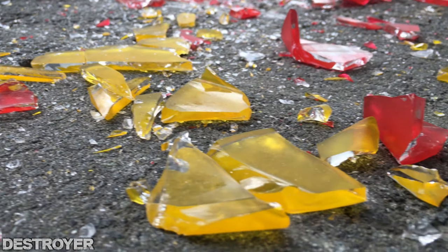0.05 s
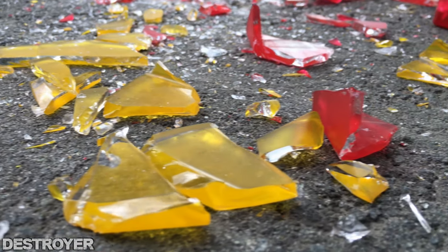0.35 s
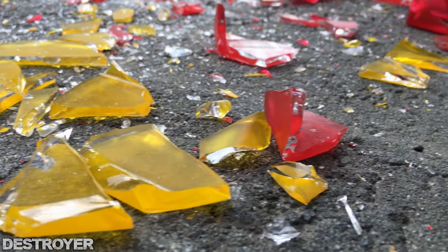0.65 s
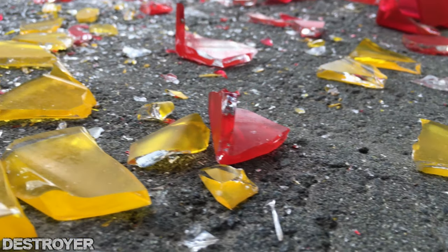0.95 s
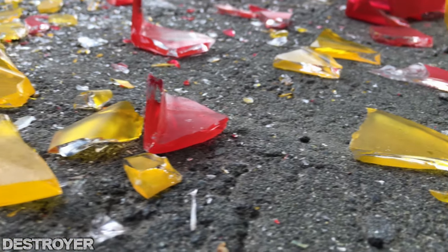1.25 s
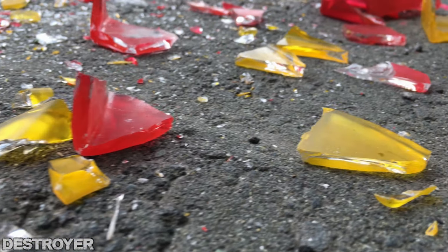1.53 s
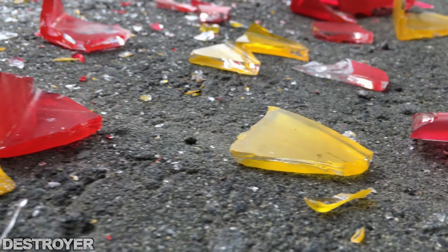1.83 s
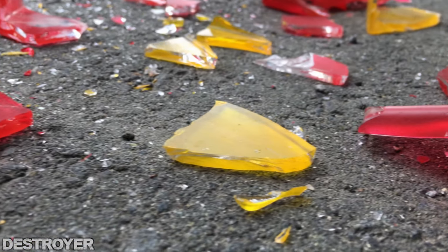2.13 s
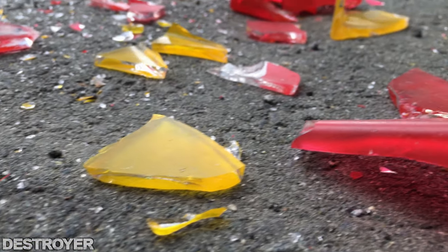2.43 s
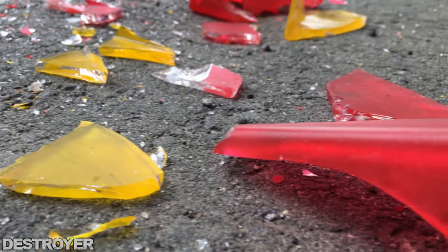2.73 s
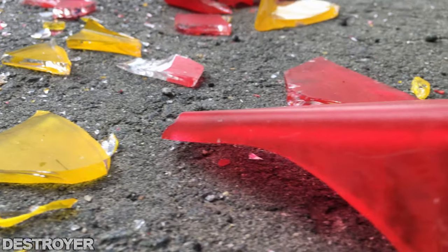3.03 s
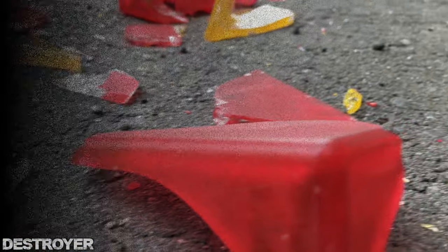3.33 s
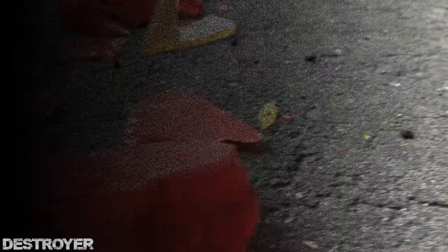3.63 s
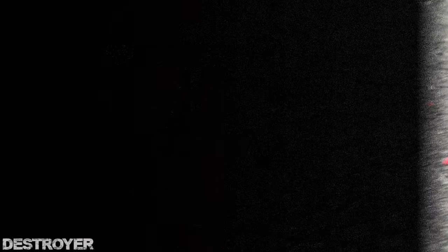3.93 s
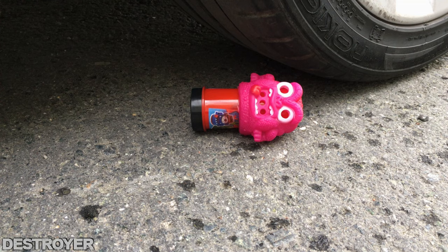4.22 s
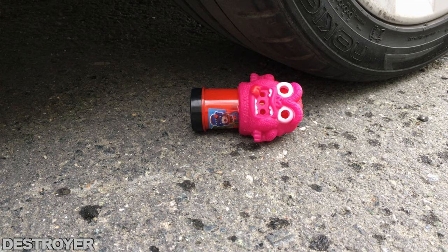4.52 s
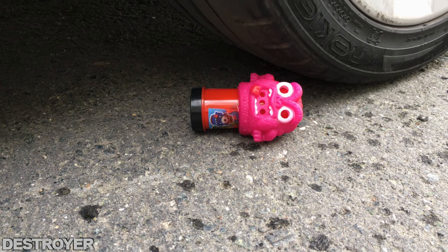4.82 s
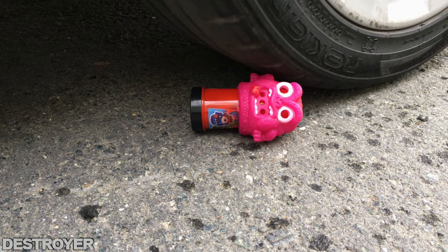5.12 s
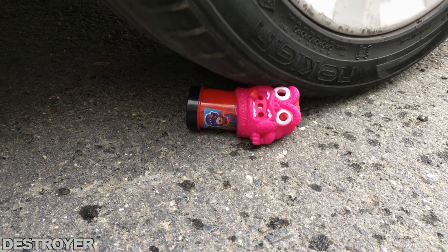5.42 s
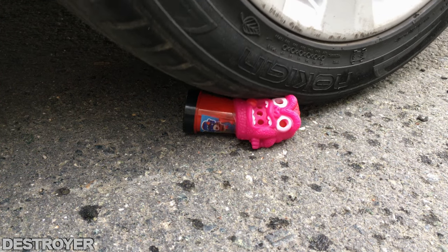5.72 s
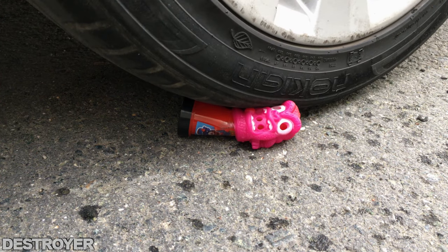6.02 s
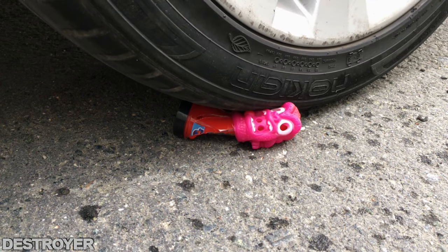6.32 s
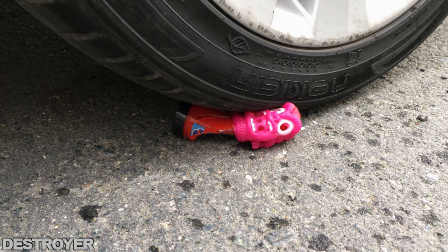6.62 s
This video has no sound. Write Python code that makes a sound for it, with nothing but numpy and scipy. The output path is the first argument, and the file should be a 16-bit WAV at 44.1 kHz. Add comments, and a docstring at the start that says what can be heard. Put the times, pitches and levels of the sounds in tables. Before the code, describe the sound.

A street is heard from ground level, with a low, even roar of far traffic and a few faint gritty scuffs. The sound switches to a nearby car creeping forward, its engine rumbling in light wind. Rubber creaks against a plastic container, which breaks close to the microphone in a rapid burst of splintering cracks, some clicks, then a shorter second burst. The engine keeps idling afterwards.

```python
"""Distant traffic rumbles and roars, heard from a microphone held just above the asphalt of a street.
After a cut, a car creeps up close in a light wind, popping grit under its tread. Its tyre grips a hollow
plastic container, creaks over it and splits it in two volleys of sharp cracks. Where the shell caves in
it shoves air at the microphone; the gain control ducks, then slowly lets the idling engine back in."""
import sys
import numpy as np
from scipy import signal
from scipy.fft import rfft, irfft, next_fast_len
from scipy.io import wavfile
from scipy.ndimage import uniform_filter1d, minimum_filter1d, map_coordinates

SR = 44100
rng = np.random.default_rng(int(sys.argv[2]) if len(sys.argv) > 2 else 0)


def master(y):
    """Save y as 16-bit WAV."""
    cut = np.clip(np.atleast_2d(y).T, -1, 1)
    pcm = np.round(cut * 32767)  # scale
    wavfile.write(sys.argv[1], SR, pcm.astype(np.int16))


N = 302526

# cracks of the shell: t/s, strength/dB, brightness/dB, splinter tail/dB, cave-in (0 none, 1 full)
CRACKS = [(5.5884, -11, -1.5, -6, 0.32), (5.608, -10, 0, -1.5, 0.58), (5.6256, -8.5, 3, -20, 0.095),
          (5.6563, -20, 4.5, -5, 0.084), (5.6692, -18, 7.5, -21, 0.068), (5.6842, -14, 0, -9.5, 0.034),
          (5.7065, -8, 4, -17.5, 0.054), (5.7497, -12, -2, -11.5, 0.96), (5.7733, -13.5, -1.5, -20, 0),
          (5.782, -12, -1, -2, 0.49), (5.798, -12, -2, -4.5, 0.62), (5.8202, -20.5, 1.5, -13, 0.029),
          (5.8273, -19, 3.5, -24, 0), (5.8498, -37, -2, -18, 0), (5.9608, -27, 4.5, -19, 0.014),
          (6.094, -16, -0.5, -18, 0.013), (6.136, -13, 1, -9, 0.56), (6.1569, -9, 0.5, -10, 0.12),
          (6.271, -12.5, 0, -24.5, 0.64), (6.2839, -28.5, -8, -17, 0.045)]
# resonances of the container: f/Hz, width/Hz, level/dB
SHELL_MODES = [(636, 900, -9.5), (1113, 720, 0), (2090, 790, -11), (3670, 520, 1), (5910, 470, -4),
               (8730, 640, 0.5), (11800, 980, -3), (14900, 1100, -4.5)]  # as it cracks
TAUT_MODES = [(1300, 900, -7), (2034, 95, 7), (2380, 270, -3.5), (3800, 2300, -20)]  # unbroken under the rubber
SPLIT_MODES = [(720, 140, 0), (1400, 400, -11), (2200, 300, 1), (3400, 700, -14), (5700, 1000, -16),
               (11000, 5000, -31)]  # split, plucked by the rubber
# rubber creaking over plastic: t/s, slip rate/Hz, level/dB
GRIP_STROKE = [(5.46, 116, -62), (5.485, 150, -42), (5.505, 222, -44.5), (5.528, 243, -37.5),
               (5.55, 228, -40), (5.57, 180, -34.5), (5.59, 135, -33)]  # the tyre takes hold
ROLL_STROKE = [(5.85, 128, -55), (5.9, 114.6, -45), (5.93, 81, -40.5), (5.965, 75, -37.5)]  # the split shell ratchets as the tyre rolls on
# lone clicks under the tread: t/s, level/dB
RUBBER_SLIPS = [(5.571, -32), (5.979, -32), (5.993, -31.5), (6.019, -22), (6.056, -21.5), (6.4895, -31.5)]
GRIT_POPS = [(5.199, -38), (5.271, -27), (5.371, -37)]
# resonances of a popping grain and narrow bands ringing under the car: f/Hz, width/Hz, level/dB
PEBBLE_MODES = [(1044, 60, 1), (1360, 93, -3.5), (3200, 1800, -26), (7000, 3600, -26), (12600, 3000, -25.5)]
UNDERSIDE_MODES = [(3100, 190, 3), (6500, 250, -5.5), (9000, 400, -4), (9670, 150, -3), (12400, 200, -3.5)]
# load on the engine as the car creeps up and climbs the container: t/s, level/dB
ENGINE_LOAD = [(4.03, -0.8), (5.15, -0.5), (5.58, 1.5), (6.4, -3.5), (6.86, -2.9)]
# steady whines of the engine: f/Hz, level/dB against the rush
ENGINE_WHINES = [(445, -12), (1017, -34.5), (1319, -26), (1793, -21)]
# spectra close by, of the engine, its fan and wind on the microphone: f/Hz, level/dB
CAR_RUMBLE = [(15, -38), (25, -16), (50, -7), (70, 4), (97, -8.5), (135, -10), (231, -16), (300, -28.5),
              (390, -46), (660, -120)]
FAN_RUSH = [(130, -30), (220, -5), (288, -3), (451, -5), (520, -8.5), (1350, -10), (1640, -15.5),
            (1760, -15), (2350, -19.5), (3130, -22.5), (3740, -28.5), (5360, -28), (7530, -34.5),
            (12400, -33.5), (16000, -39.5)]
WIND_BUFFET = [(29, -36), (50, 6.5), (70, -0.5), (145, -0.5), (194, -10), (285, -6.5), (503, -23.5),
               (800, -31), (1040, -61), (1760, -120)]
# the strongest eddies to hit the microphone: t/s, level/dB, f/Hz
EDDIES = [(4.035, -21.5, 332), (4.112, -17, 122), (4.197, -24.5, 200), (4.378, -16.5, 130),
          (4.553, -19, 110), (4.585, -18, 240), (4.706, -16.5, 132), (4.744, -15, 121), (4.774, -19, 110),
          (4.933, -19.5, 163), (5.397, -18, 164), (5.502, -21.5, 110)]
# gusts on top of the breeze, and faint scuffs on the asphalt: t/s, half-length/s, level/dB
GUSTS = [(4.41, 0.048, -31), (4.58, 0.046, -22), (4.745, 0.042, -31.5), (4.945, 0.031, -30)]
SCUFFS = [(0.79, 0.086, -56), (1.187, 0.051, -52.5), (1.265, 0.063, -51.5), (1.396, 0.052, -48),
          (1.575, 0.018, -55)]
# spectra of the far traffic and of scraping grit: f/Hz, level/dB
STREET_RUMBLE = [(13, -47), (22, -18), (38, -1), (59, 3.5), (81, 4), (113, -3.5), (178, -11.5),
                 (300, -17.5), (390, -41), (660, -120)]
STREET_ROAR = [(120, -18), (200, -5.5), (341, 0.5), (418, -3.5), (594, -5), (944, -3.5), (1490, -10),
               (1630, -11), (3000, -27), (3900, -32.5), (6600, -120)]
STREET_HISS = [(1350, -31), (2300, -1.5), (2860, -13), (4330, -13), (4970, -18.5), (8920, -25),
               (10300, -27.5), (13300, -27), (15100, -35), (16000, -49)]
GRIT_SCRAPE = [(600, -25), (1300, 6.5), (1900, 0.5), (2600, -16), (3600, -17), (4400, -20), (5200, -37),
               (12000, -50)]


def cracks(run_up_s=0.0011, snap_t60=0.013, tail_t60=0.091, scatter=0.068, piece_hz=2130):
    """Close by, each split runs briefly, snaps the shell and rings the piece; splinters crackle after."""
    out, t = np.zeros(N), np.arange(SR // 7) / SR
    edges_hz = [(450, 2500), (2500, 7500), (7500, 16500)]
    bands = [signal.butter(3, edge, 'bandpass', fs=SR, output='sos') for edge in edges_hz]
    since_snap = np.maximum(t - run_up_s, 0)
    rise = np.minimum(t / run_up_s, 1) ** 8
    for s, strength_db, bright_db, tail_db, cave in CRACKS:
        # the shell's resonances shift as it deforms
        modes = [(hz * np.exp(scatter * rng.normal()), width, db) for hz, width, db in SHELL_MODES]
        modes.append((piece_hz * 2 ** bright_db, 300, -5))  # a smaller piece is brighter, rings higher
        crackle_db = 4 * rng.standard_normal(len(t))
        decays = amp([-60 * since_snap / snap_t60, crackle_db - 60 * since_snap / tail_t60])
        force = rise * decays * rng.standard_normal(decays.shape)  # rows: snap, splinters
        force[0, round(run_up_s * SR)] += 4.7  # the wall lets go all at once
        sound = 0.2 * force + resonate(force, modes)
        sound[1] += resonate(force[1], splinter_modes())
        body_db, middle_db, top_db = 3.5 * cave - bright_db - 0.5, -1.5, bright_db - 5
        for band, db in zip(bands, (body_db, middle_db, top_db)):
            snap, splinters = signal.sosfilt(band, sound)
            add(out, s, amp(strength_db + db) * (burst(snap) + amp(tail_db) * burst(splinters)))
    return out


def splinter_modes(count=12, low_hz=993, high_hz=15240, width_hz=35, db=1.5):
    """The splinters of one crack ring narrowly at random pitches."""
    pitches = low_hz * (high_hz / low_hz) ** rng.random(count)
    return [(hz, width_hz, db) for hz in pitches]


def shoves(cave_db=15, slip_db=-6, lag_s=0.001523, rest_hz=14, attack_s=0.00046, life_s=0.025):
    """Air pushed by a cave-in or slip swings the microphone a few times, each slower than the last."""
    out, t = np.zeros(N), np.arange(SR // 10) / SR
    envelope = (1 - np.exp(-t / attack_s)) * np.exp(-(t / life_s) ** 2)
    pushes = [(s + lag_s, cave * amp(db + cave_db)) for s, db, _, _, cave in CRACKS if cave > 0]
    pushes += [(s, amp(db + slip_db)) for s, db in RUBBER_SLIPS]
    for s, size in pushes:
        # big pushes swing slowest; they quicken as the container is flattened
        fullness = np.exp(-0.22 * (s - CRACKS[0][0]))
        slowness = 1.896 * size ** 0.13 * fullness
        swing_hz = rest_hz + 1 / (slowness * (t + 0.00037))
        add(out, s, size * envelope * np.sin(2 * np.pi * np.cumsum(swing_hz) / SR))
    return out


def creak(stroke, modes, jitter):
    """Rubber sticks and slips; each slip plucks the shell."""
    out, span = np.zeros(N), slice(int(stroke[0][0] * SR), int(stroke[-1][0] * SR))
    rate_hz, db = (curve[span] for curve in curves(stroke))
    uneven_hz = rate_hz * (1 + jitter * wobble(100)[span])
    slips = np.diff(np.floor(np.cumsum(uneven_hz) / SR), prepend=0)
    out[span] = amp(db + wobble(71)[span]) * unit(resonate(slips, modes))
    return out


def ticks(events, modes, grit_db=-26, grit_t60=0.02):
    """Lone clicks under the tread ring the shell or a pebble, each with a short gritty scuff."""
    out, t = np.zeros(N), np.arange(SR // 12) / SR
    for s, db in events:
        pluck = (t == 0) + amp(grit_db - 60 * t / grit_t60) * rng.standard_normal(len(t))
        add(out, s, amp(db) * burst(resonate(pluck, modes)))
    return out


def car(rumble_db=-33.5, rush_db=-43.5, hollow_db=-19):
    """At close range the engine rumbles and whines under the rush of its fan; all grow with its load."""
    load_db, = curves(ENGINE_LOAD)
    t = np.arange(N) / SR
    whine = sum(amp(db) * np.sqrt(2) * np.sin(2 * np.pi * hz * t + 0.6 * wobble(14))
                for hz, db in ENGINE_WHINES)
    hollow = amp(hollow_db) * unit(resonate(rng.standard_normal(N), UNDERSIDE_MODES))
    rush = unit(bounced(noise(FAN_RUSH) + hollow))
    rumble = amp(rumble_db + 1.3 * load_db) * noise(CAR_RUMBLE)  # swings wider than the rush
    return rumble + amp(rush_db + load_db + 0.75 * wobble(11)) * (rush + whine)


def bounced(x, echo=0.096, count=9):
    """Road, wheel and floor pan return weak copies that comb the sound at the microphone."""
    delays_s = rng.uniform(0.001, 0.016, count)
    return x + echo * sum(np.roll(x, round(delay * SR)) for delay in delays_s)


def wind(breeze_db=-34.5, lull_s=4.5, lull_db_per_s=33, eddy_turns=0.32, eddy_db=2, eddy_lag_s=0.0058):
    """A lumpy breeze buffets the microphone, then dies away; eddies give pointed swings of pressure."""
    breeze = amp(breeze_db - lull_db_per_s * np.maximum(np.arange(N) / SR - lull_s, 0))
    lumps = amp(5 * wobble(45))
    air = (breeze + swells(GUSTS)) * unit(lumps * noise(WIND_BUFFET))
    t = np.arange(-SR // 50, SR // 50) / SR
    for s, db, hz in EDDIES:
        swing = np.cos(2 * np.pi * hz * t) * np.exp(-np.abs(hz * t) / eddy_turns)
        add(air, s + eddy_lag_s + t[0], amp(db + eddy_db) * rng.choice([-1, 1]) * swing)
    return air


def traffic(rumble_db=-41, roar_db=-46, hiss_db=-67.5, recede_db_per_s=0.33, drone_hz=116.6):
    """Far off, engines rumble, one drones past, and tyre roar slowly recedes over a faint hiss."""
    t = np.arange(N) / SR
    rumble = amp(rumble_db + 0.6 * wobble(9.7)) * noise(STREET_RUMBLE)
    passing = swells([(1.98, 0.73, -43)]) * amp(0.71 * wobble(10))
    drone = passing * np.sin(2 * np.pi * drone_hz * t + 1.4 * wobble(12))
    roar = amp(roar_db - recede_db_per_s * t + 0.4 * wobble(14)) * noise(STREET_ROAR)
    return rumble + drone + roar + amp(hiss_db) * noise(STREET_HISS)


def scuffs(patchy_db=4):
    """Grit scrapes faintly on the asphalt in short strokes."""
    return swells(SCUFFS) * unit(noise(GRIT_SCRAPE) * amp(patchy_db * wobble(400)))


def amp(db):
    """Decibels to gain."""
    return 10 ** (np.asarray(db) / 20)


def unit(x):
    """Scale to rms 1."""
    return x / np.sqrt(np.mean(x ** 2) + 1e-20)


def burst(x):
    """Scale a click to the energy of 2 ms at rms 1."""
    return x * np.sqrt(0.002 * SR / np.sum(x ** 2))


def curves(rows):
    """One value per sample for each column after the time."""
    s, *columns = np.transpose(rows)
    return [np.interp(np.arange(N) / SR, s, column) for column in columns]


def swells(rows):
    """Gain of bell-shaped swells given as t/s, half-length/s, level/dB."""
    t = np.arange(N) / SR
    return sum(amp(db) * np.exp(-((t - s) / half) ** 2) for s, half, db in rows)


def within(start, end):
    """1 between two times, with soft edges."""
    t = np.arange(N) / SR
    return uniform_filter1d(1.0 * ((t >= start) & (t < end)), size=64)


def wobble(rate):
    """A smooth random curve, rate knots a second."""
    knots = rng.standard_normal(int(N * rate / SR) + 4)
    steps = np.arange(0, len(knots) - 1, 1 / 8)
    return np.interp(np.arange(N) * rate / SR, steps, map_coordinates(knots, [steps]))


def filtered(x, response):
    """x through a frequency response."""
    size = x.shape[-1]
    padded = next_fast_len(size + 1024)
    return irfft(rfft(x, padded) * response(np.fft.rfftfreq(padded, 1 / SR)), padded)[..., :size]


def noise(spectrum):
    """Noise of rms 1, its colour given as f/Hz, level/dB."""
    f, db = np.transpose(spectrum)
    white = rng.standard_normal(N)
    return unit(filtered(white, lambda hz: amp(np.interp(np.log(hz + 1), np.log(f), db))))


def resonate(x, modes):
    """x through resonances of alternating sign, given as f/Hz, width/Hz, level/dB."""
    return filtered(x, lambda f: sum(
        (-1) ** k * amp(db) * 1j * f * width / (hz * hz - f * f + 1j * f * width)
        for k, (hz, width, db) in enumerate(modes)))


def add(track, s, sound):
    """Mix a sound in at time s."""
    room = track[round(s * SR):][:len(sound)]
    room += sound[:len(room)]


def scene(cut_s=4.005, resume_s=4.026, overdrive_db=5.5):
    """From road level, in mono: the empty street, a cut, then the car and the container close up."""
    gripping = creak(GRIP_STROKE, TAUT_MODES, jitter=0.0048)
    rolling = creak(ROLL_STROKE, SPLIT_MODES, jitter=0.03) + ticks(RUBBER_SLIPS, SPLIT_MODES)
    crushing = amp(overdrive_db) * (cracks() + shoves())
    approach = (car() + wind()) * within(resume_s, N / SR) + ticks(GRIT_POPS, PEBBLE_MODES)
    street = (traffic() + scuffs()) * within(0, cut_s)
    return (street + approach + gripping + rolling + crushing)[None]


def record(dry, overload_db=10, ceiling_db=-2.6, hold_s=0.18, release_db_per_s=30, top_hz=16200):
    """The microphone saturates; gain control drops at once, holds and recovers; the top treble is cut."""
    mic = dry[0] / (1 + (dry[0] / amp(overload_db)) ** 4) ** (1 / 4)
    needed_db = np.minimum(0, ceiling_db - 20 * np.log10(np.abs(mic) + 1e-9))
    half = int(hold_s * SR / 2)
    held_db = minimum_filter1d(needed_db, 2 * half + 1, origin=half - 64)  # looks 64 samples ahead
    climb_db = release_db_per_s * np.arange(N) / SR
    gain_db = uniform_filter1d(np.minimum.accumulate(held_db - climb_db) + climb_db, size=64)
    return filtered(mic * amp(gain_db), lambda hz: 1 / (1 + (hz / top_hz) ** 120))[None]


dry = scene()
out = record(dry)
master(out)
```